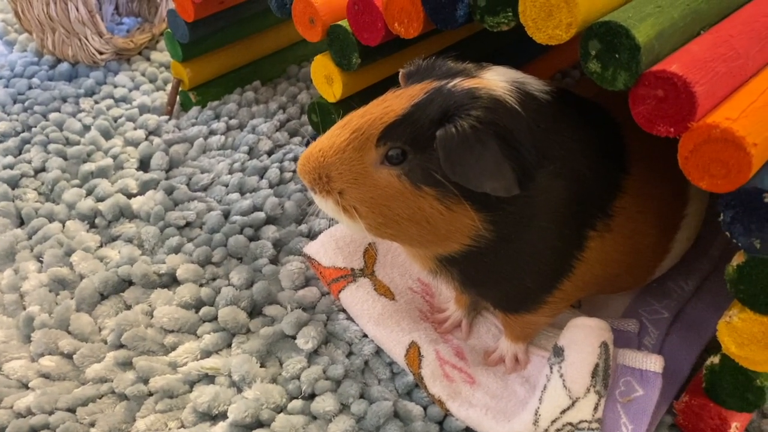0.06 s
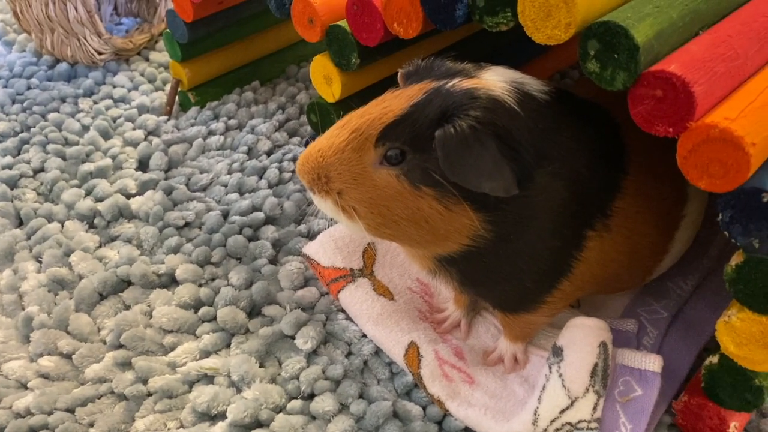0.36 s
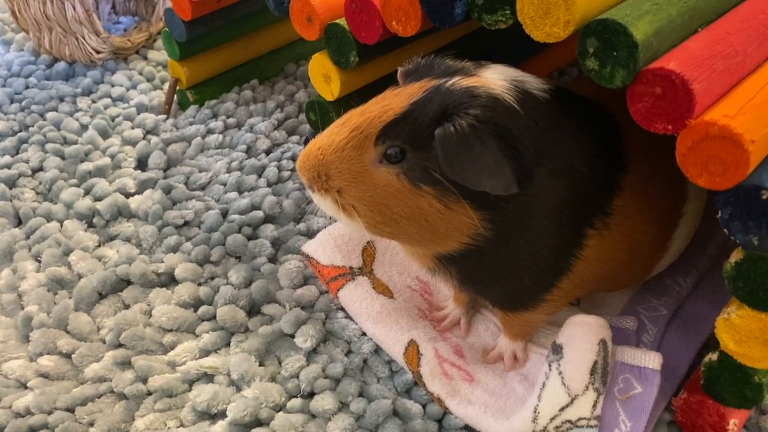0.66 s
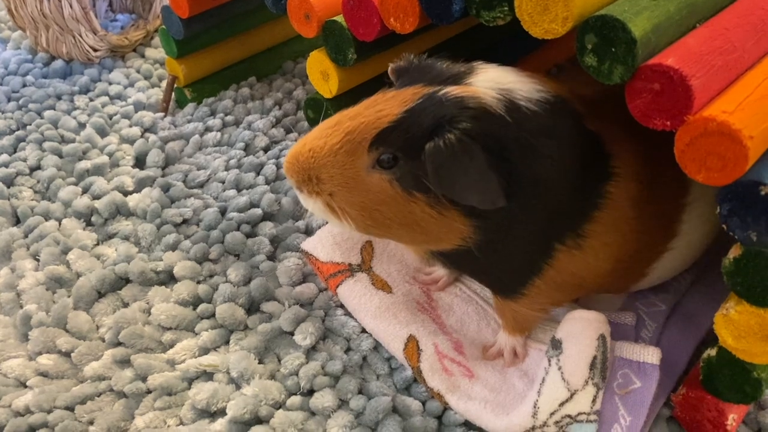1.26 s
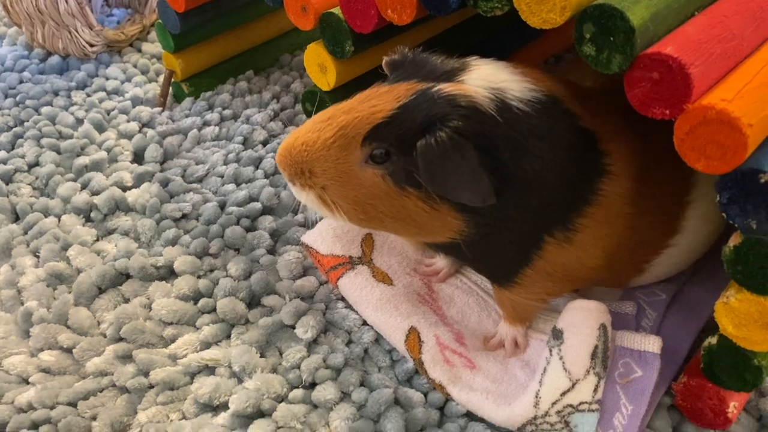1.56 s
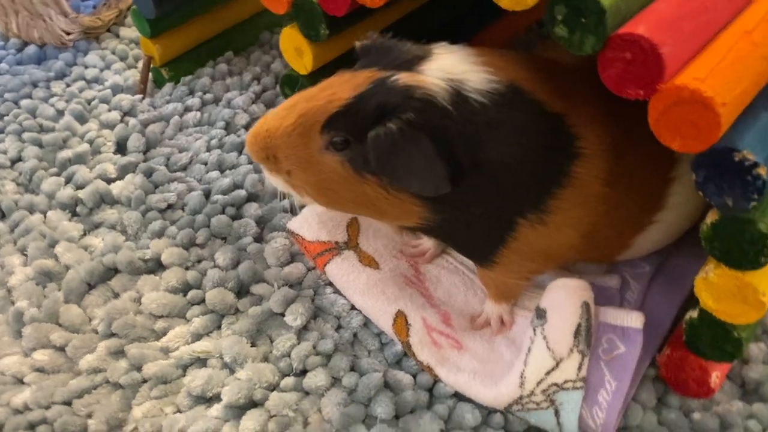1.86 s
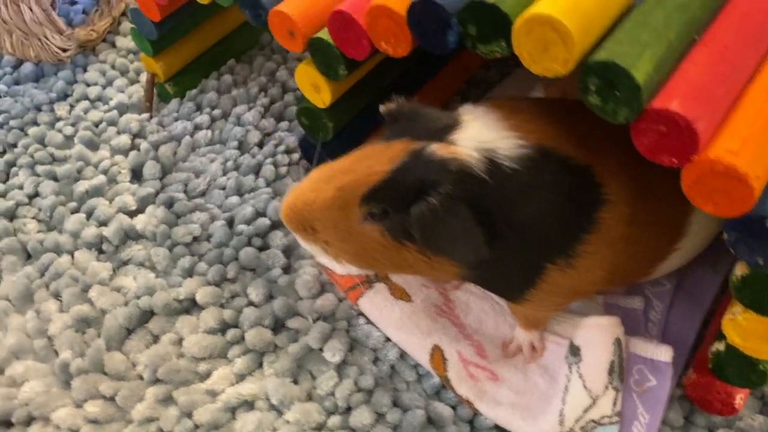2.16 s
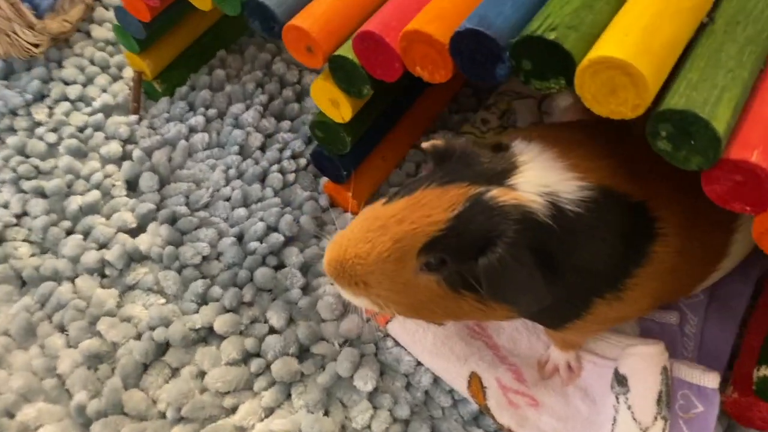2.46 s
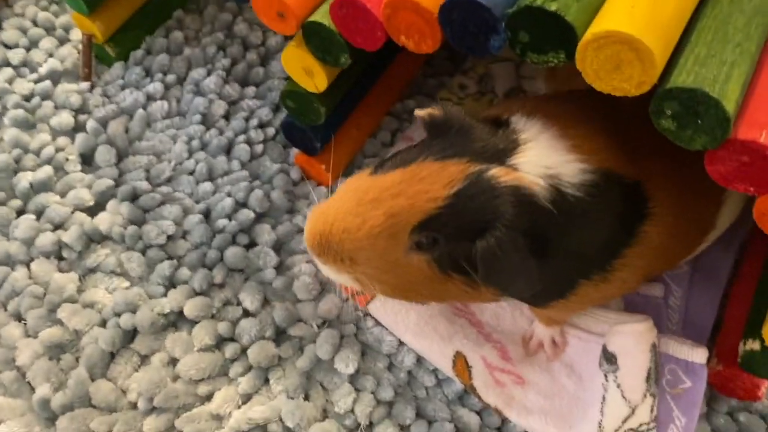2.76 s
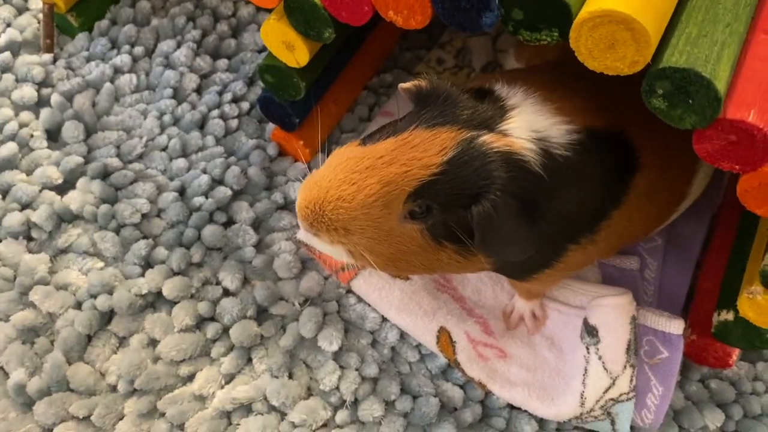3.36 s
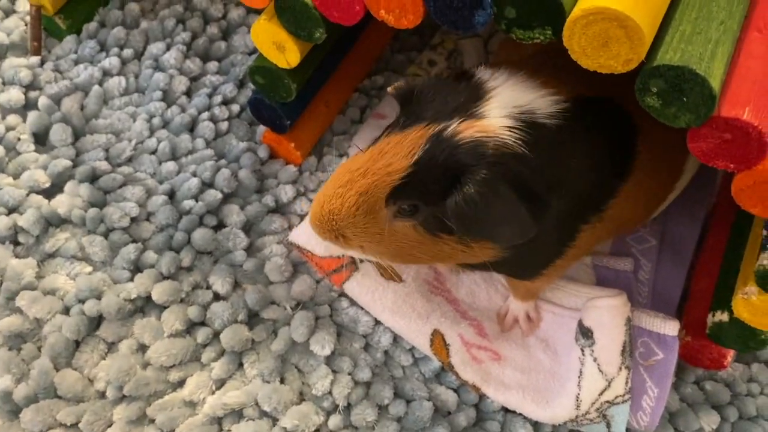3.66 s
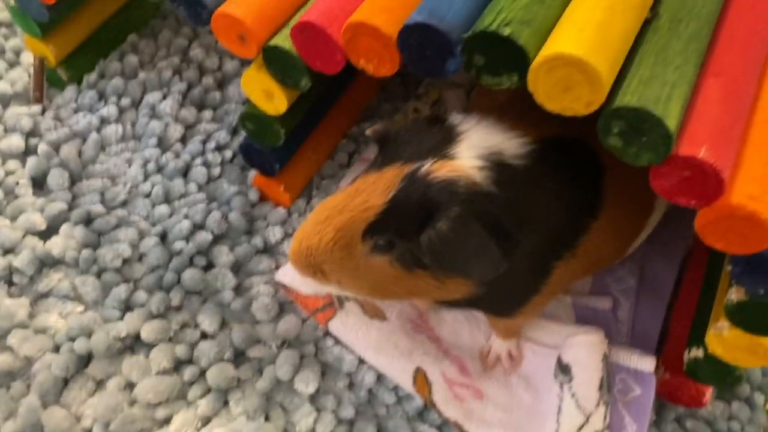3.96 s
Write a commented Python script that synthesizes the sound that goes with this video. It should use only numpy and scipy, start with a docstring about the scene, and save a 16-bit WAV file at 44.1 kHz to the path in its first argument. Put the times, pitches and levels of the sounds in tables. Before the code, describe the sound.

A guinea pig sniffing in tiny rapid puffs over a quiet low room hum.

```python
"""A guinea pig sniffs the air close to the microphone, about nine tiny puffs a second.
Each puff hisses and whistles at the nostrils and rings hollow in the nose. Fur rustles as the
animal shifts forward on a soft mat, with a few small ticks, scuffs and padded bumps.
Underneath is a quiet room tone: low appliance hum, swelling rumble and drone, steady hiss."""
import sys
import numpy as np
from scipy.fft import rfft, irfft, next_fast_len
from scipy.io import wavfile
from scipy.ndimage import map_coordinates

SR = 44100
rng = np.random.default_rng(int(sys.argv[2]) if len(sys.argv) > 2 else 0)


def wav_out(sig):
    """Save sig, one row per channel (or a flat mono array), as 16-bit PCM at SR to the path in sys.argv[1]."""
    wavfile.write(sys.argv[1], SR, np.round(np.clip(np.atleast_2d(sig).T, -1, 1) * 32767).astype(np.int16))


N = 176400
TIME = np.arange(N) / SR


def amp(db):
    """Decibels to gain."""
    return 10 ** (np.asarray(db) / 20)


def unit(x):
    """Scale to rms 1."""
    return x / np.sqrt(np.mean(x ** 2) + 1e-20)


def along(points, hz):
    """Read (frequency, value) points on a log frequency axis."""
    freqs, values = np.transpose(points)
    return np.interp(np.log(hz + 1), np.log(freqs + 1), values)


def fader(points):
    """Ride through (time, level) points, one value per sample."""
    return np.interp(TIME, *np.transpose(points))


def wobble(rate_hz):
    """Smooth random modulation."""
    knots = rng.standard_normal(int(N * rate_hz / SR) + 4)
    return map_coordinates(knots, [TIME * rate_hz])


def filtered(x, response):
    """Pass x through a frequency response."""
    size = next_fast_len(N + SR // 2)
    hz = np.fft.rfftfreq(size, 1 / SR)
    return irfft(rfft(x, size) * response(hz), size)[..., :N]


# Stereo image of diffuse sound (frequency [Hz], left-right correlation [-1 to 1])
STEREO_IMAGE = [(50, 0.94), (130, 0.91), (300, 0.6), (600, 0.04), (1400, -.15), (2500, 0.44), (4200, 0.55),
                (5600, 0.17), (7000, 0.85), (9000, 1), (15000, 0.99)]
def noise(eq_db):
    """Mid-side noise of rms 1, coloured by an EQ function."""
    def response(hz):
        spread = np.arccos(np.clip(along(STEREO_IMAGE, hz), -.995, .995)) / 2
        return amp(eq_db(hz)) * [np.cos(spread), np.sin(spread)]
    mid, side = filtered(rng.standard_normal((2, N)), response)
    return unit(np.array([mid + side, mid - side]))


def rush(eq_points):
    """Noise through a drawn EQ curve."""
    return noise(lambda hz: along(eq_points, hz))


def band(centre_hz, octaves):
    """Noise in one resonance."""
    return noise(lambda hz: -40 * np.log10(1 + (np.log2((hz + 1) / centre_hz) / octaves) ** 2 / 2))


def strike(start, attack_s, t60):
    """Percussive envelope: fast attack, exponential decay."""
    age = np.maximum(TIME - start, 0)
    return (1 - np.exp(-age / attack_s)) * np.exp(-np.log(1000) * age / t60)


# Faint appliance tones above the hum (pitch [Hz], level [dB])
APPLIANCE_TONES = [(122, -62.5), (147, -61.5), (166, -66.5), (204, -68), (662, -85.5), (1558, -96.5)]
def appliance_hum():
    """A low sine hum and fainter tones, each wavering in level."""
    def tone(hz, db, waver_db, waver_hz):
        gain = amp(db + waver_db * wobble(waver_hz))
        return gain * np.sqrt(2) * np.sin(2 * np.pi * (hz * TIME + rng.random()))
    hum = tone(hz=51.1, db=-41, waver_db=0.9, waver_hz=2.8)
    return hum + sum(tone(hz, db, waver_db=3, waver_hz=5.7) for hz, db in APPLIANCE_TONES)


# Swells of the deep rumble (time [s], level [dB])
RUMBLE_FADER = [(0, -43.5), (.22, -42.5), (.32, -34), (.39, -47.5), (.47, -38), (.58, -47.5), (.8, -42.5),
                (.95, -40), (1.15, -40.5), (1.3, -46.5), (1.65, -41), (1.9, -40.5), (2.25, -41), (2.5, -51),
                (2.7, -47), (3.0, -40), (3.2, -47), (3.4, -39.5), (3.55, -47.5), (4, -40.5)]
# Its bass-heavy colour (frequency [Hz], gain [dB])
RUMBLE_EQ = [(12, -35), (25, -18.5), (32, -12.5), (40, -3), (50, -1), (62, 2.5), (74, -2.5), (84, 4.5),
             (92, -2), (112, -7), (150, -25.5), (250, -53.5), (600, -102)]
# Swells of the drone (time [s], level [dB])
DRONE_FADER = [(0, -53), (.6, -55), (1.05, -51), (1.3, -57), (1.6, -54), (1.85, -51), (2.3, -51),
               (2.7, -57), (3.0, -52.5), (3.3, -53.5), (4, -55.5)]
# Its boxy colour (frequency [Hz], gain [dB])
DRONE_EQ = [(20, -39.5), (60, -14), (110, 1.5), (150, 0.5), (200, -4), (250, -11), (310, -18), (420, -20),
            (800, -44.5), (3000, -120)]
def room_rumble():
    """The room's low end: deep noise and a boxy drone above it, swelling separately."""
    rumble = amp(fader(RUMBLE_FADER)) * rush(RUMBLE_EQ)
    drone = amp(fader(DRONE_FADER)) * rush(DRONE_EQ)
    return rumble + drone


# Colour of the room's hiss (frequency [Hz], gain [dB])
HISS_EQ = [(100, -3), (350, 0.5), (650, 1), (1000, -6.5), (1500, -11.5), (3000, -18.5), (5000, -21),
           (8000, -23), (11000, -26.5), (13500, -30.5)]
def room_hiss():
    """An even bed of hiss with the top rolled off."""
    corner_hz, rolloff_db_per_hz = 13700, .02
    hiss = noise(lambda hz: along(HISS_EQ, hz) - rolloff_db_per_hz * np.maximum(hz - corner_hz, 0))
    return amp(-65) * hiss


# Swell of the rustle as the animal shifts (time [s], level [dB])
RUSTLE_FADER = [(0, -98), (1.0, -87), (1.6, -85), (1.77, -80), (1.87, -81), (2.05, -71), (2.2, -70.5),
                (2.32, -66), (2.5, -71.5), (2.8, -75.5), (3.2, -81), (4, -101)]
# Colour of fur on bedding (frequency [Hz], gain [dB])
FUR_EQ = [(150, -9), (400, 16.5), (700, 18.5), (1500, 3.5), (3000, 0.5), (6000, 1.5), (9000, -5),
          (13000, -9), (15500, -12)]
def fur_rustle():
    """Fur brushes the bedding: grainy noise that creeps in and fades away."""
    grain_db = 2 * wobble(rate_hz=90)
    return amp(fader(RUSTLE_FADER) + grain_db) * rush(FUR_EQ)


# Small ticks (time [s], level [dB], pitch [Hz], decay to -60 dB [s])
TICK_CUES = [(0.9497, -46.5, 7800, 0.0029), (1.0276, -45, 1100, 0.0024), (3.251, -60, 3400, .004)]
def ticks():
    """Tiny dry clicks: a snap of two fast-dying modes, then a faint room tail."""
    attack_s, overtone_ratio = 0.0001, 1.38
    out = np.zeros((2, N))
    for start, db, hz, t60 in TICK_CUES:
        phase = 2 * np.pi * hz * (TIME - start)
        modes = np.cos(phase) + amp(-3) * np.cos(overtone_ratio * phase)
        snap = modes * strike(start, attack_s, t60)
        tail = amp(-26) * band(hz, octaves=.35) * strike(start, attack_s, t60=0.08)
        out += amp(db) * (snap + tail)
    return out


# Scuffs on the mat, plus two brief bright whistles of breath near 2.3 and 2.5 s (time [s], level [dB], band
# centre [Hz], width [octaves])
SCUFF_CUES = [(1.019, -58.5, 320, 0.8), (1.634, -66, 740, 0.52), (1.741, -63, 950, 0.4),
              (1.757, -65, 990, 0.75), (2.105, -59.5, 384, 0.62), (2.30, -67.5, 6200, .18),
              (2.512, -72, 6300, .1), (2.402, -64, 1140, 0.35), (2.511, -54.5, 514, 0.31),
              (2.618, -64, 1100, 0.59), (2.985, -53.5, 276, 0.52), (3.336, -69, 606, .6),
              (3.799, -58, 360, .4), (3.892, -56, 370, .4)]
def mat_scuffs():
    """Paws and belly drag briefly on the mat, each a burst of band noise; the two bright, narrow bursts are
    short whistles of breath at the nostrils."""
    return sum(amp(db) * band(hz, octaves) * strike(start, attack_s=0.00067, t60=0.23)
               for start, db, hz, octaves in SCUFF_CUES)


# Puffs of air (peak time [s], nostril level [dB], nose cavity level [dB], half-width [s],
# lower whistle [Hz], upper whistle [Hz])
SNIFF_CUES = [(1.160, -77.5, -99, 0.024, 9000, 11000), (1.277, -73, -79, 0.013, 9600, 12400),
              (1.382, -71, -74, 0.0085, 10000, 13100), (1.484, -67, -75, 0.0083, 9100, 12100),
              (1.588, -67, -70.5, 0.0073, 9000, 11500), (1.690, -66, -73, 0.009, 8300, 11700),
              (1.791, -67.5, -69, 0.0074, 8500, 12800), (1.89, -67.5, -76, 0.0089, 8840, 12800),
              (1.993, -65.5, -67, 0.0073, 9100, 10200), (2.10, -68.5, -72, 0.009, 9000, 11400),
              (2.203, -66, -67.5, 0.0079, 9500, 11200), (2.310, -67.5, -73, 0.012, 8700, 9900),
              (2.414, -67, -76, 0.0083, 7700, 10300), (2.521, -69, -69.5, 0.011, 6400, 10900),
              (2.628, -67.5, -70, 0.0086, 8600, 10400), (2.74, -66.5, -75, 0.0083, 8800, 10200),
              (2.855, -68, -71, 0.009, 8700, 10200), (2.973, -69, -70, 0.0088, 8300, 10900),
              (3.092, -76.5, -73, 0.015, 9000, 10200), (3.21, -79, -84, .014, 9000, 12500)]
# Bright air jet in the nostrils (frequency [Hz], gain [dB])
NOSTRIL_EQ = [(2000, -8), (4000, -12), (5500, -7.5), (6600, -3.5), (8500, 1.5), (11000, -1.5), (13000, -7),
              (15500, -8.5)]
# Hollow colour of the nose cavity (frequency [Hz], gain [dB])
CAVITY_EQ = [(250, -20), (600, -3.5), (1100, 4.5), (1700, -3), (2500, -4.5), (3600, -10.5), (6000, -19),
             (12000, -50)]
def sniffing():
    """Short swells of air: hiss and two breathy whistles at the nostrils, a hollow rush in the nose."""
    flank_steepness, whistle_octaves = 1.12, 0.071
    hiss, hollow = rush(NOSTRIL_EQ), rush(CAVITY_EQ)
    out = np.zeros((2, N))
    for peak, jet_db, cavity_db, half_width, lower_hz, upper_hz in SNIFF_CUES:
        airflow = (1 + ((TIME - peak) / half_width) ** 2 / 2) ** -flank_steepness
        lower_whistle = amp(-6) * band(lower_hz, whistle_octaves)
        upper_whistle = amp(-7.5) * band(upper_hz, whistle_octaves)
        jet = unit(hiss + lower_whistle + upper_whistle)
        out += airflow * (amp(jet_db) * jet + amp(cavity_db) * hollow)
    grain_db = 2.1 * wobble(rate_hz=400)
    return out * amp(grain_db)


# Soft bumps of paws and body (time [s], level [dB], pitch [Hz], decay to -60 dB [s])
BUMP_CUES = [(1.7876, -46.5, 141, 0.18), (3.8029, -41.5, 175, .06), (3.8987, -40.5, 228, 0.022),
             (3.916, -41, 218, 0.024)]
def soft_bumps():
    """Dull contacts on the padded floor: a low, quickly damped thud with a little noise."""
    out = np.zeros((2, N))
    for start, db, hz, t60 in BUMP_CUES:
        thud = np.sin(2 * np.pi * hz * (TIME - start))
        scuff = amp(-9) * band(hz, octaves=.65)
        out += amp(db) * (thud + scuff) * strike(start, attack_s=.001, t60=t60)
    return out


def scene():
    """The animal's movement and breath over the room tone."""
    room_tone = appliance_hum() + room_rumble() + room_hiss()
    return room_tone + fur_rustle() + ticks() + mat_scuffs() + sniffing() + soft_bumps()


# Balance of the two microphone ports (frequency [Hz], left minus right [dB])
PORT_BALANCE = [(40, -0.2), (170, -1), (350, 1), (700, 3.5), (1400, 0), (2800, 2.5), (5500, 2.5),
                (9000, -0.5)]
def record(dry):
    """Soft ends and a high cut; two microphone ports differ in level, and the left lags in the treble."""
    fade_s, high_cut_hz = .004, 15800
    lag_s, lag_from_hz = 0.00024, 6950
    def ports(hz):
        split = np.array([[.5], [-.5]])  # half the difference to each side
        lag_phase = 2 * np.pi * lag_s * np.maximum(hz - lag_from_hz, 0)
        balance = amp(split * along(PORT_BALANCE, hz))
        return balance * np.exp(-1j * split * lag_phase) * (hz < high_cut_hz)
    to_edge_s = np.minimum(TIME, TIME[::-1])
    fade = np.sin(np.pi / 2 * np.minimum(to_edge_s / fade_s, 1))
    return filtered(dry * fade, ports)


dry = scene()
out = record(dry)
wav_out(out)
```